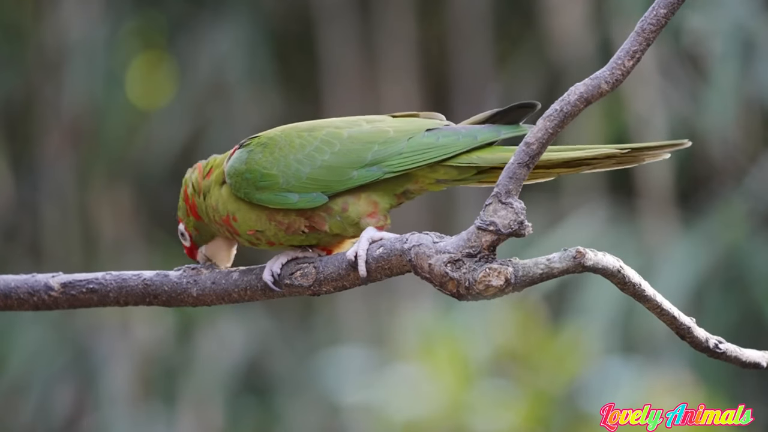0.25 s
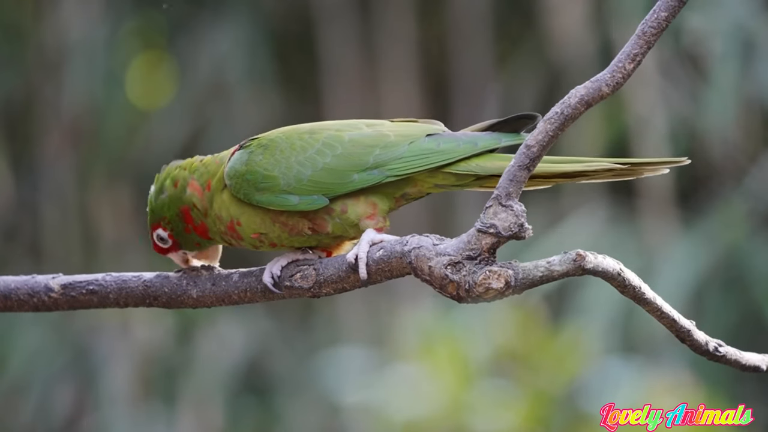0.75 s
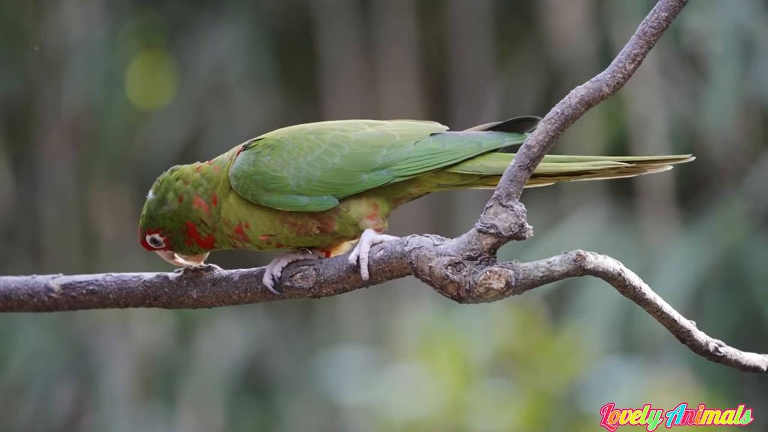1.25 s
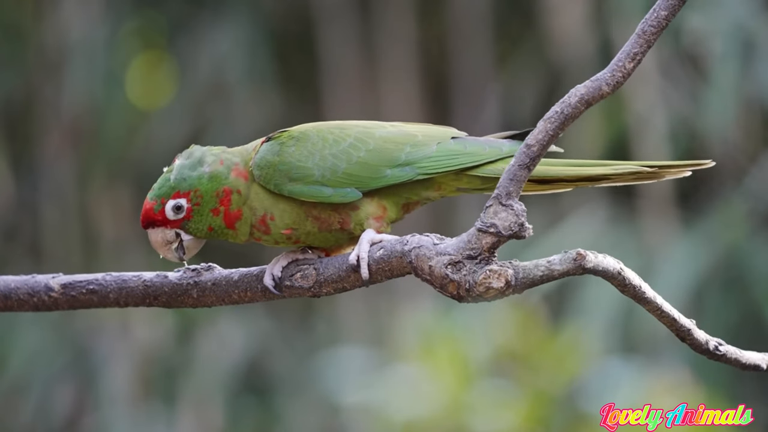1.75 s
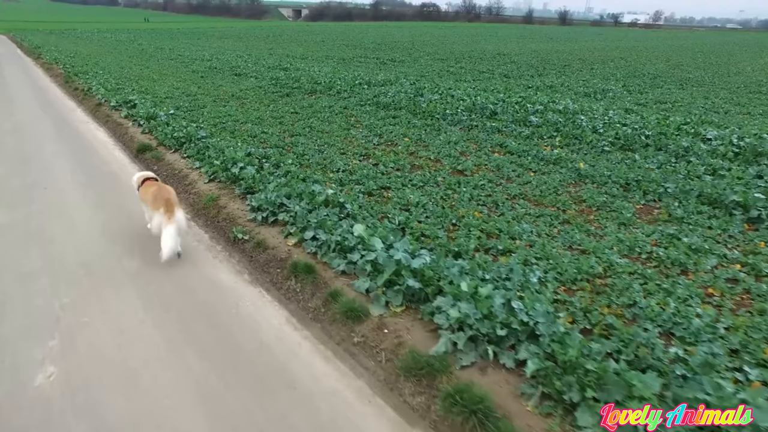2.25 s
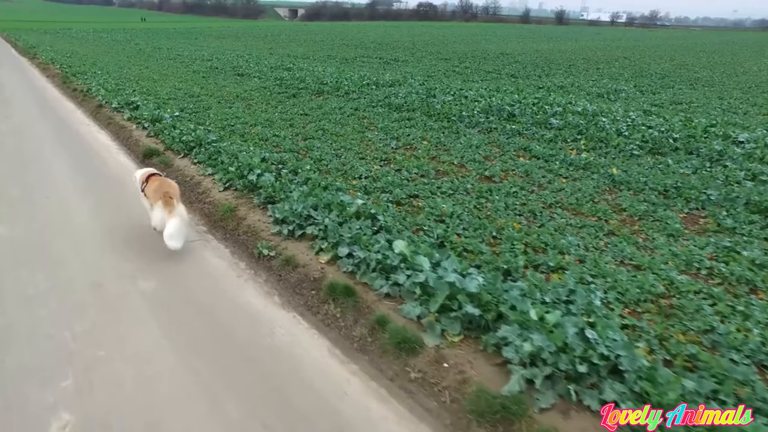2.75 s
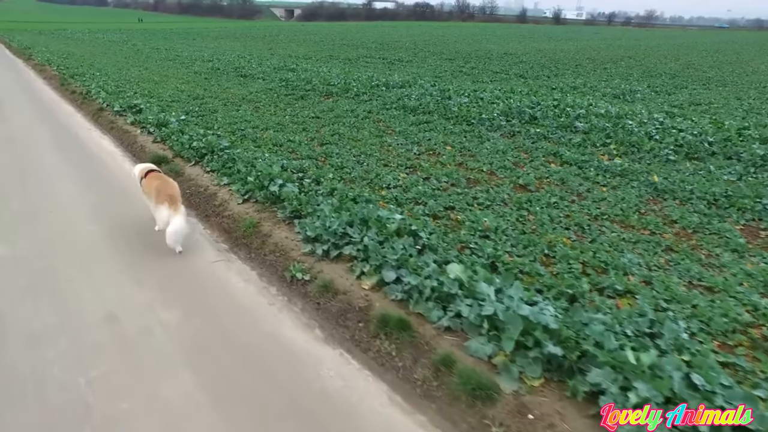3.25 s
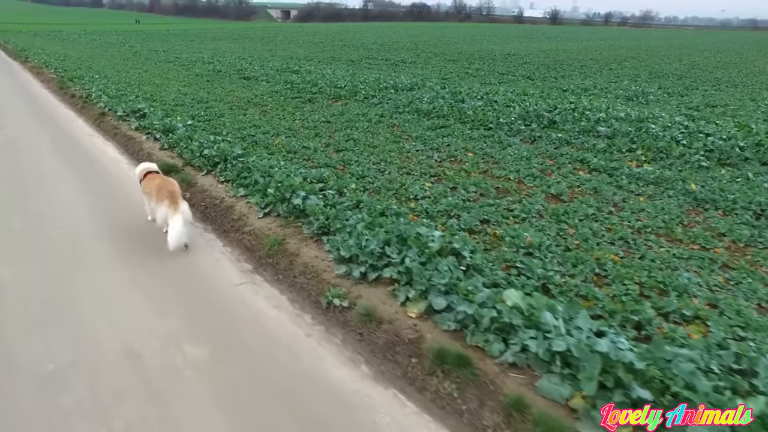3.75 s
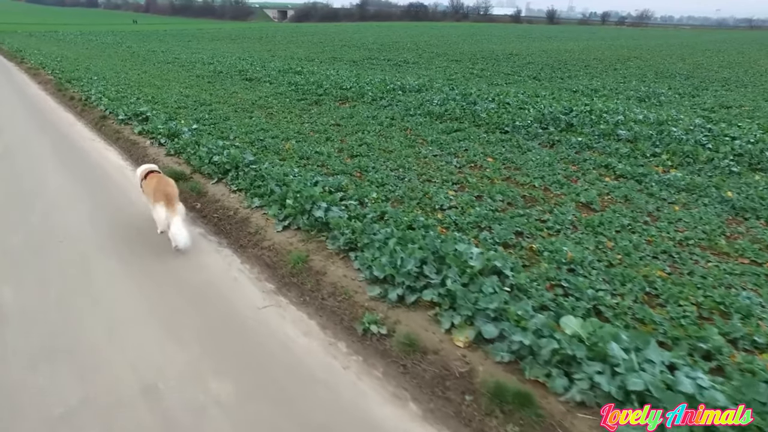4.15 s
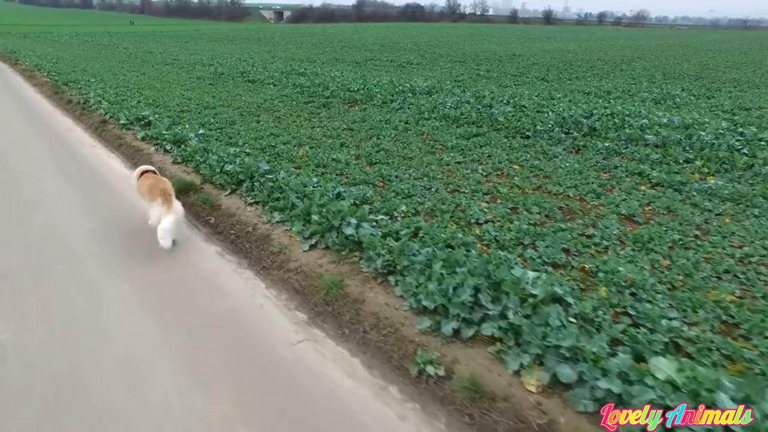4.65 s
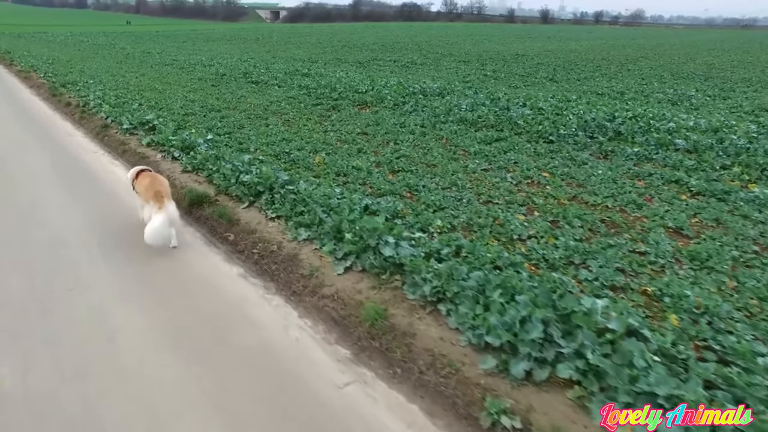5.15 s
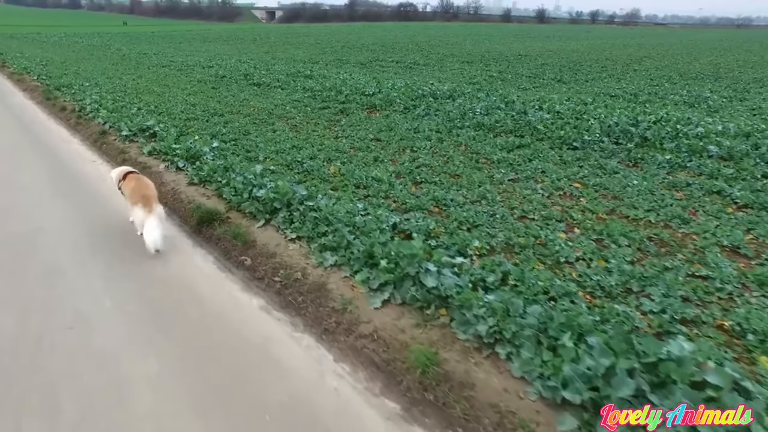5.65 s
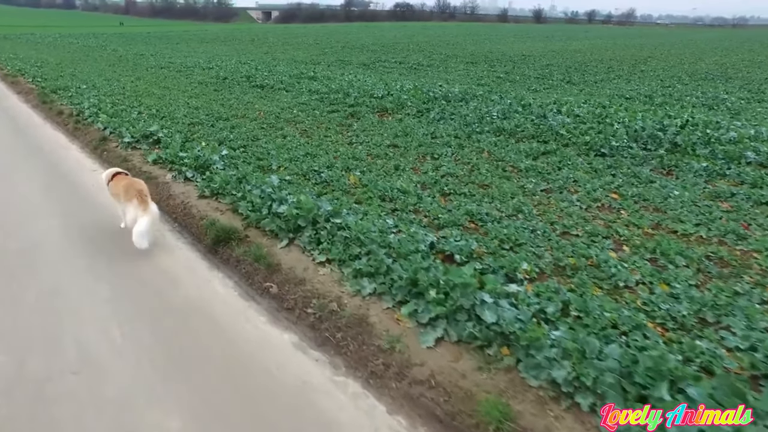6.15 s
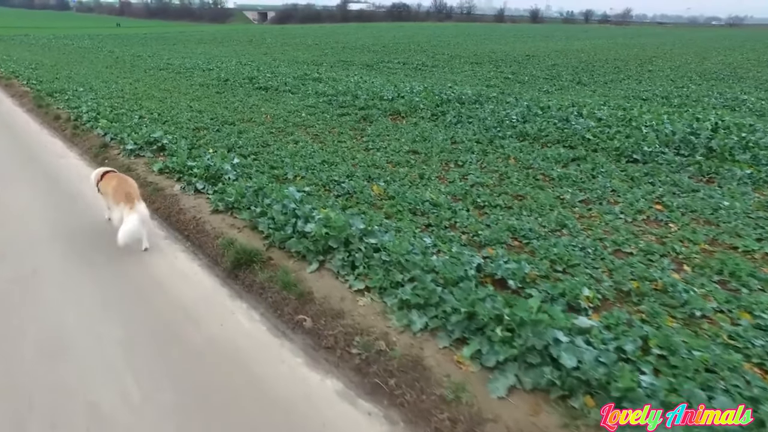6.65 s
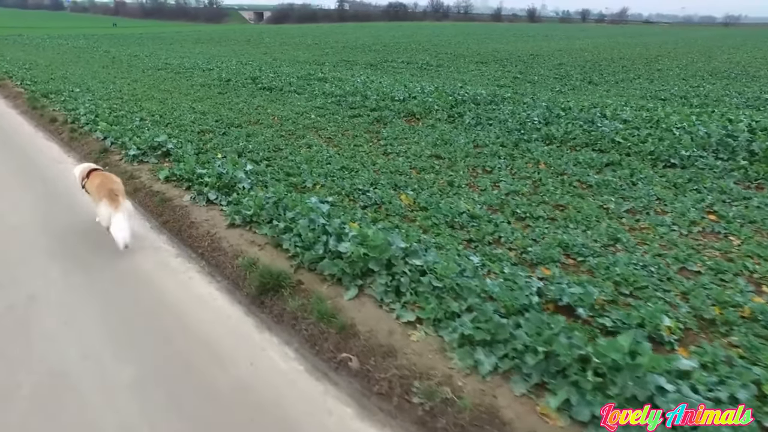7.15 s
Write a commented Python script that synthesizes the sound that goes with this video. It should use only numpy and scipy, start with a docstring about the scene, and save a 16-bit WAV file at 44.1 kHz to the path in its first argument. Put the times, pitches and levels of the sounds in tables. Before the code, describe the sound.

Close parrots give quick, overlapping nasal whines that scoop up, quaver and drop, with a hoarse toneless screech and a harsh stuttering squawk; faint birds sound behind. After two seconds this cuts abruptly to an open field with light low wind. A clear yelping dog barks several times, then a low gruff dog answers, the two mixing, with dull short outdoor echoes.

```python
"""Parrots whine in quavering nasal calls, with a hoarse screech and a harsh stuttering squawk.
They stop short; an open field follows, with light wind, grit cracks and two dogs barking in turn:
one with a clear arching yelp, one low and gruff, each with a dull outdoor echo.
Voices are unsteady pulse trains with turbulence, filtered by a throat; the screech is filtered noise.
Far birds are gliding sines; air and wind are coloured noise; echoes are decaying random reflections."""
import sys
import numpy as np
from scipy import signal
from scipy.fft import rfft, irfft
from scipy.io import wavfile
from scipy.ndimage import uniform_filter1d, map_coordinates

SR = 44100
rng = np.random.default_rng(int(sys.argv[2]) if len(sys.argv) > 2 else 0)


def generate_wav(signal):
    """Clip the signal to [-1, 1] and save it as 16-bit WAV at the path in sys.argv[1]."""
    frames = np.transpose(np.atleast_2d(signal))
    scaled = np.clip(frames, -1, 1) * 32767
    pcm = np.round(scaled).astype(np.int16)
    wavfile.write(sys.argv[1], SR, pcm)


N = 326340
TIME = np.arange(N) / SR
CUTOFF_HZ = 15750
FIELD_START_S = 2.189


def whines():
    """Nasal parrot calls: scoop, lilting hold, crest and drop; a fast quaver shakes pitch and level together."""
    # Each row: start in s, time to the crest in s, length in s, held pitch in Hz, crest pitch in Hz,
    # glide in octaves/s, nominal fundamental in dB, nominal overtones in dB, swell in dB/s,
    # hoarseness (0-1), source tilt in dB/octave, quaver as a share of the pitch.
    calls = [(0.177, .15, .257, 1920, 2174, 0.032, -45, -41.5, 40, 0.14, -3, 0.022),
             (0.257, 0.18, 0.23, 1911, 2360, .9, -42.5, -44, 10, .15, 2, 0.024),
             (0.439, 0.073, .24, 1562, 1935, -0.53, -47, -50, 7, 0, -15, 0.047),
             (0.609, .158, 0.26, 1927, 2103, -.55, -40, -42.5, -18, .08, 1, 0.021),
             (0.851, .162, 0.23, 1950, 2447, -0.019, -47, -53, -60, .2, -1, 0.024),
             (1.443, .175, .215, 1938, 2440, 0, -40, -41.5, -14.5, 0.26, 1.5, 0.024),
             (1.576, 0.085, 0.14, 2023, 2210, -0.11, -39, -43, 22, 0.28, -1.5, 0.02),
             (1.97, .156, .2, 1912, 2260, -0.078, -43, -39.5, 49, 0.1, -8, 0.016)]
    # Parrot throat resonances. Each row: frequency in Hz, relative level in dB.
    throat = [(710, -56.5), (1200, -27.5), (1380, -12.5), (1920, -1), (2510, -1.5), (2980, -8.5),
              (4110, -4.5), (5090, -16.5), (6370, -13.5), (6870, -21), (9990, -22), (12800, -34),
              (15500, -36.5)]
    scoop_octaves, scoop_s = .42, .02
    drop_octaves, drop_s = 0.38, .009
    crest_half_width_s = .025
    lilt_octaves, lilt_s, lilt_growth_s = .055, .095, .16  # depth at the crest, period, growth time
    low_db_per_octave, high_db_per_octave = 26, 15  # higher is louder
    quaver_hz, throb_db = 78.28, 2.1
    out = np.zeros(N)
    for (start, to_crest, length, held_hz, crest_hz, glide, low_db, high_db,
         swell, rough, slope_db, quaver) in calls:
        t = span(start, length)
        late = t - start - to_crest
        lilt = lilt_octaves * (1 + late / lilt_growth_s) * np.cos(2 * np.pi * late / lilt_s)
        crest = (np.log2(crest_hz / held_hz) - lilt_octaves) * np.exp(-(late / crest_half_width_s) ** 2)
        scoop = scoop_octaves * np.exp((t[0] - t) / scoop_s)
        drop = drop_octaves * np.exp((t - t[-1]) / drop_s)
        octaves = glide * late + lilt + crest - scoop - drop

        shake = np.sin(2 * np.pi * np.cumsum(quaver_hz * (1 + .16 * drift(15, len(t)))) / SR)
        shake *= np.clip(1 + 0.27 * drift(2.7, len(t)), 0, 2)
        pitch = held_hz * 2 ** octaves * (1 + quaver * shake)
        source = folds(pitch, jitter=0.0098, jitter_hz=497, rough=rough, slope_db=slope_db, count=8)
        voice = colour(source, throat)

        # fundamental and overtones levelled apart
        low_level_db = low_db + low_db_per_octave * octaves + 2.3 * drift(30, len(t))
        high_level_db = high_db + high_db_per_octave * octaves + 2.52 * drift(20, len(t))
        low = even(cut(voice, 2720, "low")) * from_db(low_level_db)
        high = even(cut(voice, 2850, "high")) * from_db(high_level_db)
        add(out, t, (low + high) * from_db(swell * late + throb_db * shake), fade=0.011)
    return out


def squawk():
    """Harsh syllables of pulses and turbulence; each swoops down and lifts again, clearest in the middle."""
    # Each row: start in s, length in s, base pitch in Hz, nominal level in dB.
    syllables = [(1.677, 0.028, 833, -39), (1.706, 0.023, 922, -30.5), (1.728, 0.024, 1083, -26),
                 (1.753, 0.025, 1246, -23), (1.782, .030, 1296, -24), (1.802, 0.039, 1241, -27.5)]
    # Squawk throat resonances. Each row: frequency in Hz, relative level in dB.
    throat = [(470, -74), (800, -35.5), (1330, -17), (2350, -9.5), (2570, -6), (3460, -6.5), (3860, -9),
              (4770, -15), (5200, -16), (10300, -16), (11800, -19.5), (12900, -39.5), (15500, -29.5)]
    out = np.zeros(N)
    for start, length, base_hz, level_db in syllables:
        t, progress = read_call([(start, 0), (start + length, 1)])
        pitch = base_hz * (1 + .55 * np.exp(-progress / 0.097) + 0.13 * progress ** 6)
        edge = (2 * progress - 1) ** 2
        rough = .26 + .5 * edge
        voice = colour(folds(pitch, jitter=0.027, jitter_hz=600, rough=rough), throat)
        add(out, t, voice * from_db(level_db - 5.3 * edge + 0.5), fade=0.00097, release=0.0011)
    return out


def screech():
    """Throat-coloured noise, toneless: it swells quickly, then dies away as its resonances sink."""
    # Screech throat resonances. Each row: frequency in Hz, relative level in dB.
    throat = [(710, -77), (1200, -39.5), (2390, -16.5), (2570, -21.5), (3380, -7), (3800, -12), (4270, -3),
              (8040, -28), (11400, -26), (14200, -44), (15000, -58.5)]
    attack_s, rise_db, fall_db_per_s = .048, 16.5, 113
    peak_db, flutter_db = -35, 2.5  # before the mix gains
    sag_octaves_per_s = 4.5
    out, t = np.zeros(N), span(1.096, .15)
    late = t - t[0] - attack_s
    level_db = peak_db + np.minimum(rise_db * late / attack_s, -fall_db_per_s * late)
    # reading the noise ever slower sinks its resonances
    read_at = np.cumsum(2 ** (-sag_octaves_per_s * late))
    noise = colour(rng.standard_normal(int(read_at[-1]) + 2), throat)
    rasp = map_coordinates(noise, [read_at], order=3)
    add(out, t, rasp * from_db(level_db + flutter_db * drift(130, len(t))), fade=0.013, release=0.04)
    return out


def yelping_dog():
    """Clear arching yelps: the fundamental is reinforced."""
    # Each row: crest in s, rise in s, fall in s, top pitch in Hz, end pitch in Hz, then nominal levels
    # of tone, rasp and hiss in dB, relative hoarseness (0-1), source tilt in dB/octave.
    calls = [(2.135, 0.09, 0.081, 661.8, 562, -26, -41, -50.5, .8, -10),
             (3.144, 0.079, .095, 649.3, 395.2, -18, -34.5, -46, .9, -13),
             (3.517, 0.086, 0.089, 614, 415.4, -18, -42, -51, 0.32, -9.5),
             (3.893, 0.086, .086, 612, 434.5, -19.5, -45, -55, 0.21, -5.5),
             (5.068, .076, 0.091, 680.6, 462.7, -21, -36.5, -48, 0.84, -12.5),
             (6.551, 0.082, 0.08, 680, 436.3, -21.5, -37.5, -49, 0.19, -2.5)]
    # One row: pitch-arch flatness, level-arch flatness, then drops at the ends in dB of tone, rasp,
    # hiss and hoarseness, lag of the rasp behind the tone in s.
    shape = (2.6, 4, 21.5, 15.5, 15.5, 7, 0)
    # Throat and hiss spectra. Each row: frequency in Hz, relative level in dB.
    throat, hiss = [(180, -85), (300, -63.5), (418, -43), (506, -27), (556, -10.5), (602, -7.5), (852, -5),
                    (954, -14), (1320, -25), (1450, -26), (1670, -19.5), (2400, -48.5), (3120, -83.5),
                    (5280, -120)], [(1120, -29.5), (1900, -11.5), (2130, -4.5), (2750, 1.5),
                                         (3220, -18.5), (3420, -25.5), (4410, -4), (5220, -12.5),
                                         (6610, -14), (7480, -14), (8020, -20.5), (9900, -23.5),
                                         (11000, -37.5), (12700, -29), (15500, -43)]
    return barks(calls, shape, throat, hiss, jaw=0.1998, jitter=0.017, jitter_hz=154.4, shimmer_db=1.65,
                 tone_db=2.5, rasp_db=11, hiss_db=4.5, order=1, clear_db=-2.5)


def gruff_dog():
    """Low hoarse woofs: the second harmonic is reinforced."""
    # Each row: crest in s, rise in s, fall in s, top pitch in Hz, end pitch in Hz, then nominal levels
    # of tone, rasp and hiss in dB, relative hoarseness (0-1), source tilt in dB/octave.
    calls = [(4.055, 0.077, 0.09, 255.3, 215.2, -20.5, -27.5, -48, 0.97, -1.5),
             (4.9, 0.074, 0.097, 258.5, 215.2, -19, -25, -49, 0.97, -0.75),
             (5.245, .07, 0.098, 256, 170, -21, -30.5, -53.5, 0.75, -1.3),
             (5.556, .072, .12, 252, 148, -23, -33.5, -60, 0.79, -0.68),
             (5.882, .08, 0.1, 249, 146, -23, -34, -61.5, 0.53, -0.69)]
    # One row: pitch-arch flatness, level-arch flatness, then drops at the ends in dB of tone, rasp,
    # hiss and hoarseness, lag of the rasp behind the tone in s.
    shape = (2.98, 2.4, 20.5, 22.5, 18.8, 3.5, .006)
    # Throat and hiss spectra. Each row: frequency in Hz, relative level in dB.
    throat, hiss = [(130, -62), (220, -45), (348, -20), (456, -8), (490, 3), (592, -13.5), (799, 4),
                    (919, 3), (1120, -19.5), (1290, -7), (1500, -17.5), (1660, -38.5), (1890, -28.5),
                    (2260, -52), (2400, -32.5), (3120, -87), (5280, -120)], [(1120, -44.5), (1900, -6.5), (2260, -29), (2520, -1.5),
                                         (2850, -18.5), (3130, -6.5), (3610, -22), (3840, -15.5),
                                         (4910, -0.5), (6440, -12.5), (7480, -13), (8310, -21),
                                         (10700, -26), (13600, -43.5), (15500, -29)]
    return barks(calls, shape, throat, hiss, jaw=.8, jitter=0.033, jitter_hz=117, shimmer_db=1.9,
                 tone_db=1.5, rasp_db=5.0, hiss_db=7.0, order=2, clear_db=-3.0)


def barks(calls, shape, throat, hiss, jaw, jitter, jitter_hz, shimmer_db,
          tone_db, rasp_db, hiss_db, order, clear_db):
    """One arch of effort lifts pitch, level and the throat resonances, which shift with the jaw."""
    out = np.zeros(N)
    pitch_flat, level_flat, tone_drop_db, rasp_drop_db, hiss_drop_db, hoarse_drop_db, rasp_lag_s = shape
    for crest, rise, fall, top_hz, end_hz, tone, rasp, breath, rough, slope_db in calls:
        t = span(crest - rise, rise + fall)
        late = t - crest
        pitch = top_hz * (end_hz / top_hz) ** slack(late, rise, fall, pitch_flat)
        tone_slack = slack(late, rise, fall, level_flat)
        rasp_slack = slack(late - rasp_lag_s, rise, fall, level_flat)

        # the resonances shift by reading the voice faster or slower; the source pitch compensates
        shift = (pitch / top_hz) ** jaw
        read_at = np.cumsum(shift)
        steps = np.arange(int(read_at[-1]) + 2)
        hoarse = rough * from_db(2.5 - hoarse_drop_db * rasp_slack)  # hoarsest where most forced
        source_pitch = np.interp(steps, read_at, pitch / shift)
        source_hoarse = np.interp(steps, read_at, hoarse)
        voice = colour(folds(source_pitch, jitter, jitter_hz, source_hoarse, slope_db), throat)
        low, high = [even(np.interp(read_at, steps, cut(voice, 926, side))) for side in ("low", "high")]

        # the harmonic of the given order rings clear
        ring_hz = order * pitch * (1 + 0.0088 * drift(60, len(t)))
        ring = np.sin(2 * np.pi * np.cumsum(ring_hz) / SR)
        low = even(low + from_db(clear_db) * ring)
        breathy = colour(folds(pitch, jitter, jitter_hz, rough=2.3, count=8), hiss)
        breathy = cut(breathy, 2050, "high")

        sound = low * from_db(tone + tone_db - tone_drop_db * tone_slack)
        sound += high * from_db(rasp + rasp_db - rasp_drop_db * rasp_slack)
        sound += breathy * from_db(breath + hiss_db - hiss_drop_db * rasp_slack)
        add(out, t, sound * from_db(shimmer_db * drift(39, len(t))), fade=.016, release=.026)
    return out


def slack(late, rise, fall, flatness):
    """How far a bark is from full effort: 1 at both ends, 0 at the crest."""
    away = np.clip(np.maximum(-late / rise, late / fall), 0, 1)
    return np.sin(np.pi / 2 * away) ** flatness


def folds(pitch, jitter, jitter_hz, rough, slope_db=0, count=12):
    """Pulses of an unsteady vibrating membrane, with a puff of turbulence in every cycle."""
    size = len(pitch)
    phase = 2 * np.pi * np.cumsum(pitch * (1 + jitter * drift(jitter_hz, size))) / SR
    k = np.arange(1, count + 1)[:, None]
    harmonics = from_db(slope_db * np.log2(k)) * np.cos(k * phase)
    pulses = np.sum(harmonics * (k * pitch < CUTOFF_HZ), axis=0)
    puffs = rng.standard_normal(size) * (1 + np.cos(phase))
    return pulses * np.sqrt(4 * pitch / SR) + rough * puffs


def far_birds():
    """Unsteady gliding sines that fade away: low hoots nearly pure, the high whistle husky."""
    # Each row: start in s, length in s, first pitch in Hz, last pitch in Hz, nominal level in dB.
    notes = [(1.17, .28, 3060, 2700, -41), (.15, .14, 345, 400, -61), (.43, .2, 305, 325, -64),
             (1.83, .13, 595, 564, -63)]
    fade_db = 13
    out = np.zeros(N)
    for start, length, first_hz, last_hz, level_db in notes:
        t, pitch, fall_db = read_call([(start, first_hz, 0), (start + length, last_hz, fade_db)])
        jitter = np.minimum(pitch / 50000, .05)
        phase = 2 * np.pi * np.cumsum(pitch * (1 + jitter * drift(400, len(t)))) / SR
        level = from_db(level_db - fall_db + 2 * drift(40, len(t)))
        add(out, t, np.sin(phase) * level, fade=.03, release=.03)
    return out


def grit():
    """Tiny stones crack on the path: high-passed, fast-decaying noise."""
    # Grit underfoot. Each row: start in s, nominal level in dB.
    cracks = [(2.9534, -61), (4.3074, -61), (6.1264, -73)]
    out = np.zeros((2, N))
    for start, level_db in cracks:
        at, t = int(start * SR), TIME[:2000]
        crack = from_db(level_db - 2) * np.exp(-t / .003) * rng.standard_normal((2, len(t)))
        out[:, at:at + len(t)] += crack
    return cut(out, 1800, "high")


def wind():
    """Light wind: mostly low noise whose level wanders in gusts."""
    # Wind strength. Each row: time in s, level in dB before gain.
    strength = [(2.25, -56.5), (2.39, -57.5), (3.28, -54.5), (4.19, -56.5), (5.91, -55), (7.4, -58.5)]
    # Field air spectrum. Each row: frequency in Hz, relative level in dB.
    spectrum = [(13, -54), (22, -8), (76, -2), (142, -9.5), (233, -20.5), (275, -13), (352, -26),
                (438, -24), (608, -18.5), (1080, -32.5), (1210, -32), (2030, -37), (2270, -37.5),
                (4510, -43.5), (15500, -48.5)]
    gain_db, gust_db = 4, 1.0
    level_db = np.interp(TIME, *np.transpose(strength)) + gain_db + gust_db * drift(3.6, N)
    return from_db(level_db) * air(spectrum, alike=0.13)


def air(spectrum, alike):
    """Stereo background noise, partly shared between the sides."""
    mid, side = [colour(noise, spectrum, size=16384) for noise in rng.standard_normal((2, N))]
    alike = np.clip(alike, 0, 1)
    return rms_one(np.sqrt(1 + alike) * mid + np.sqrt(1 - alike) * side * [[1], [-1]])


def echoes(x, t60, first_s, dull_hz, size=40000):
    """Scattered reflections that build up and die away, their treble dulled; different on each side."""
    t = TIME[:size]
    scatter = rng.standard_normal((2, size)) * from_db(-60 * t / t60) * (1 - np.exp(-(t / first_s) ** 2))
    scatter /= np.sqrt(np.sum(scatter ** 2, axis=1, keepdims=True))
    r = np.exp(-2 * np.pi * dull_hz / SR)
    dulled = signal.lfilter([1 - r], [1, -r], scatter)
    return signal.fftconvolve(x[None], dulled, axes=1)[:, :N]


def place(x, pan_db, lag_ms):
    """A direction: level difference left minus right, and a delay at the left ear."""
    left = np.interp(TIME - lag_ms / 1000, TIME, x) * from_db(pan_db / 2)
    return np.array([left, x * from_db(-pan_db / 2)])


def from_db(db):
    """Decibels to gain."""
    return 10 ** (np.asarray(db) / 20)


def rms_one(x):
    """Scale to unit power."""
    return x / np.sqrt(np.mean(x ** 2) + 1e-20)


def span(start, length):
    """The sample times of an event."""
    return TIME[int(start * SR):int((start + length) * SR)]


def read_call(rows):
    """The sample times of a call, then each column interpolated along them."""
    s, *columns = np.transpose(rows)
    t = TIME[max(int(s[0] * SR), 0):int(s[-1] * SR)]
    return [t] + [np.interp(t, s, c) for c in columns]


def add(track, t, sound, fade=0.0019, release=.01):
    """Mix a sound in at its times, swelling in and dying out."""
    start = int(round(t[0] * SR))
    edge = np.clip(np.minimum((t - t[0]) / fade, (t[-1] - t) / release), 0, 1)
    track[start:start + len(t)] += sound * np.sin(np.pi / 2 * edge) ** 2


def drift(rate_hz, size):
    """Unit-power random wander: noise through a two-pole low-pass at the given rate."""
    r = np.exp(-2 * np.pi * rate_hz / SR)
    wander = signal.lfilter([1], [1, -2 * r, r * r], rng.standard_normal(size + 8000))
    return rms_one(wander[8000:])


def cut(x, hz, kind):
    """Steep low- or high-pass."""
    return signal.sosfilt(signal.butter(6, hz, kind, fs=SR, output="sos"), x)


def colour(x, spectrum, size=2048):
    """Causal (minimum-phase) filter with the given spectrum; unit power."""
    hz, db = np.transpose(spectrum)
    bins = np.maximum(np.fft.rfftfreq(size, 1 / SR), 1)
    cepstrum = irfft(np.log(from_db(np.interp(np.log(bins), np.log(hz), db))))
    # folding the cepstrum gives minimum phase
    cepstrum[1:size // 2] *= 2
    cepstrum[size // 2 + 1:] = 0
    impulse = irfft(np.exp(rfft(cepstrum)))
    return rms_one(signal.fftconvolve(x, impulse)[:len(x)])


def even(x, size=700):
    """Hold the short-term power near one, leaving the fast grain."""
    return x / np.sqrt(np.maximum(uniform_filter1d(x ** 2, size), 0) + 1e-6)


def perch():
    """Parrots, close; leaves scatter their treble to the sides, trees blur the farther birds."""
    # Perch air spectrum. Each row: frequency in Hz, relative level in dB.
    spectrum = [(25, -11), (85, -5), (140, -14), (220, -9), (340, -17), (1200, -21), (2100, -17),
                (4000, -15), (7500, -24), (15500, -31)]
    burst = screech()
    birds = whines() + squawk() + burst
    notes = far_birds()
    distant = from_db(-3) * (notes + echoes(notes, t60=.3, first_s=.008, dull_hz=9000))
    treble = cut(birds, 4000, "high")
    leaves = from_db(-2.0) * echoes(treble, t60=0.057, first_s=.0013, dull_hz=15100, size=2000)
    trees = from_db(-11) * echoes(birds, t60=0.39, first_s=0.015, dull_hz=7000)
    trees += from_db(-9.5) * echoes(burst, t60=.7, first_s=0.044, dull_hz=9000)
    return from_db(-1.04) * birds + distant + leaves + trees + from_db(-62.5) * air(spectrum, alike=.7)


def field():
    """Two dogs drifting ever more to the right, scatter from the crop, far echoes, wind and grit."""
    yelps, woofs = yelping_dog(), gruff_dog()
    start_pan_db, pan_db_per_s = -0.65, -.5
    pan_db = start_pan_db + pan_db_per_s * (TIME - FIELD_START_S)
    dogs = place(yelps, pan_db, lag_ms=0.304) + place(woofs, pan_db - 0.2, lag_ms=0.089)
    treble = cut(yelps + woofs, 1080, "high")
    crop = from_db(-6) * echoes(treble, t60=0.026, first_s=0.0014, dull_hz=12000, size=2000)
    far = from_db(-14) * echoes(yelps, t60=0.45, first_s=0.043, dull_hz=3800)
    far += from_db(-14.5) * echoes(woofs, t60=0.41, first_s=0.041, dull_hz=3000)
    return dogs + crop + far + wind() + grit()


def scene():
    """The parrots' perch fades out abruptly; an instant later the field begins."""
    perch_end_s, perch_decay_s = 2.16, 0.0078
    perch_gain = np.exp(-np.maximum(TIME - perch_end_s, 0) / perch_decay_s)
    return perch() * perch_gain + field() * (TIME > FIELD_START_S)


def record(dry):
    """Steep elliptic low-pass at the cutoff."""
    return signal.sosfilt(signal.ellip(12, .1, 80, CUTOFF_HZ, fs=SR, output="sos"), dry)


dry = scene()
out = record(dry)
generate_wav(out)
```